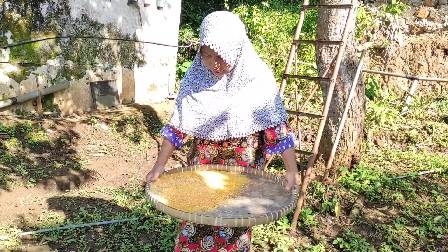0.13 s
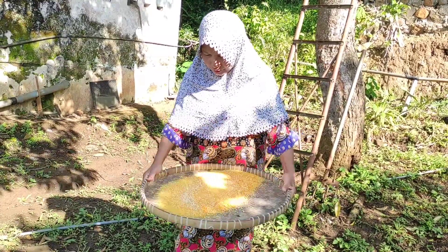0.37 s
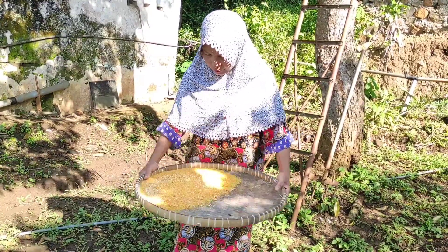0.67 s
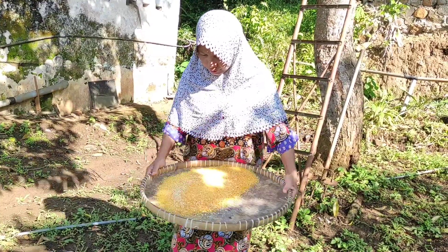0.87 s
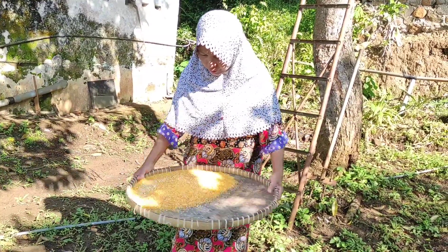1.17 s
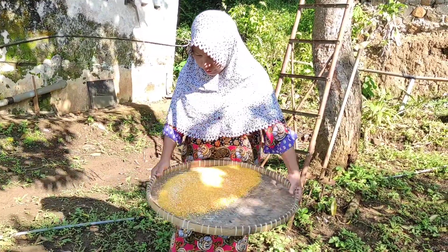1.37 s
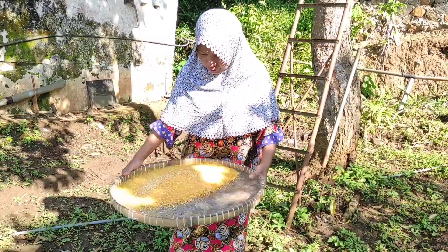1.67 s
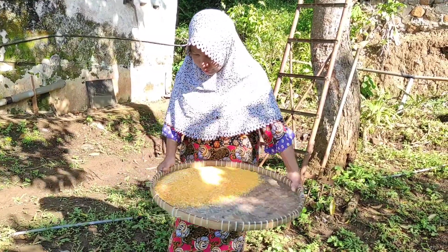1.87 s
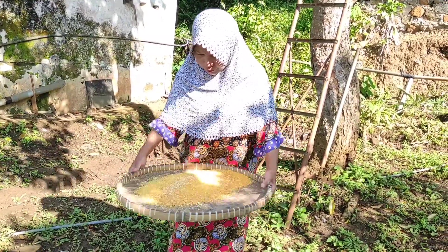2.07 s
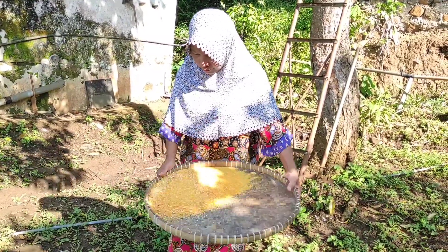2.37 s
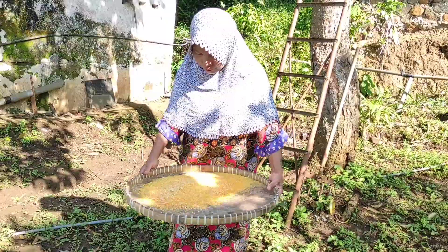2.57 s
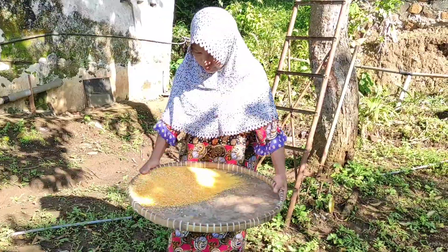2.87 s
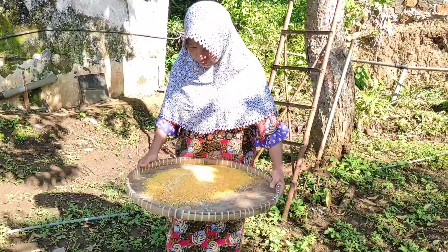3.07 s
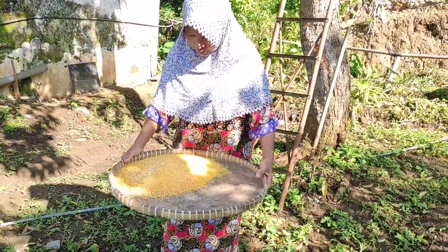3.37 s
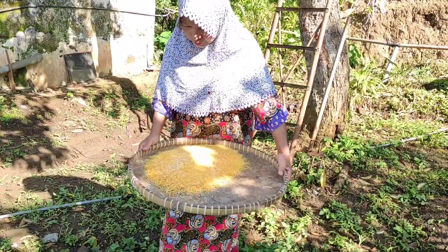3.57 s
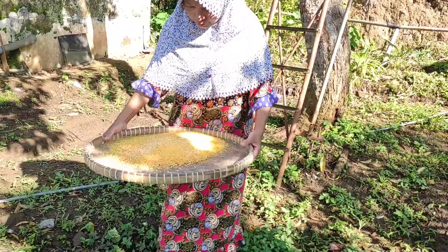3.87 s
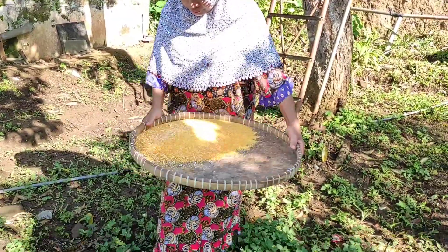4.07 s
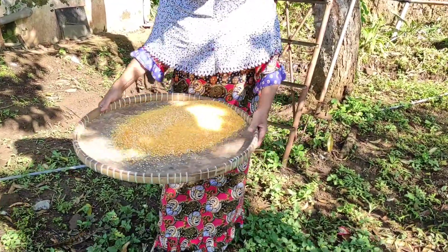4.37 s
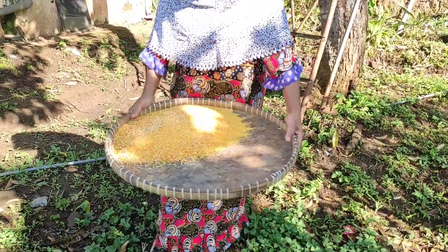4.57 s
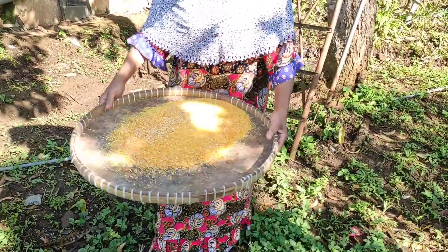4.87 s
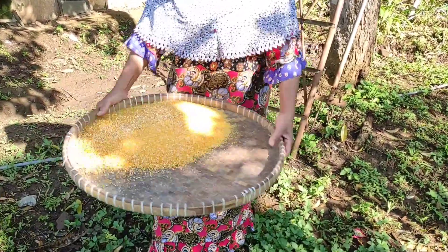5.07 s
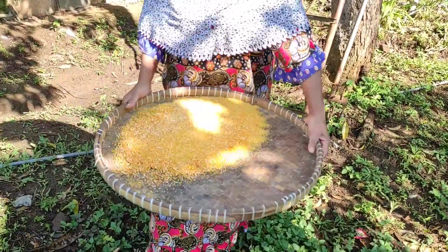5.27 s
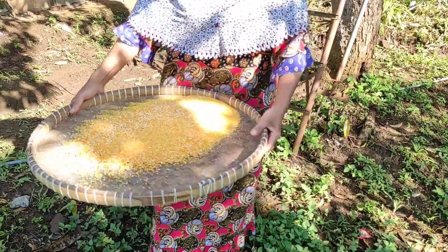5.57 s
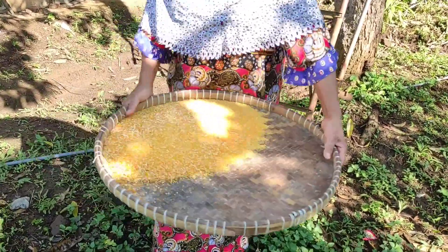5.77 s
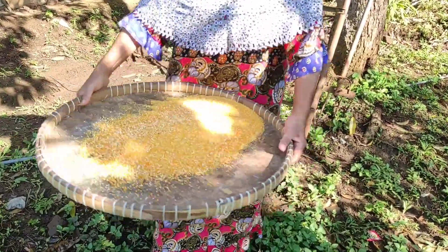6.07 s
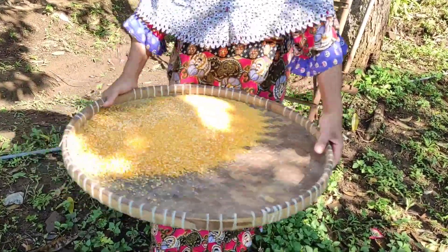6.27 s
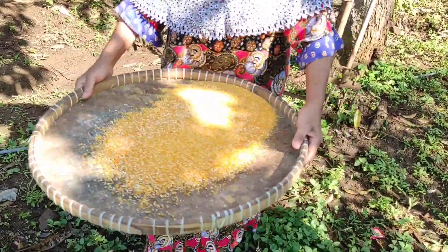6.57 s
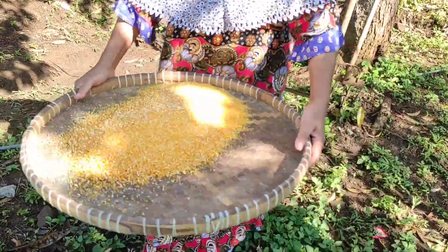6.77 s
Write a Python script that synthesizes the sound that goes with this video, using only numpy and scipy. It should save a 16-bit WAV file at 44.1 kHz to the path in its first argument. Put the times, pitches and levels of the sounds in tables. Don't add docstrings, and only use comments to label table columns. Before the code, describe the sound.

From the start, ground grain slides across a woven bamboo tray in regular alternating strokes, away and back, just under four swells a second. Each is a dense bright hiss of countless kernels with a dry rasp of weave and a muffled hollow drumming, fading to a thin trickle between strokes. The open yard adds a faint murmur of air and leaves. Light wind rumbles unevenly on either side, with brief low thumps near 0.9, 1.6, 3.1, 3.4 and 3.8 seconds. Light rim clicks appear around 2.3, 2.9 and 3.4. After 4 seconds the microphone is nearer: strokes become louder and raspier, with hard dry clicks at 4.6 and 5.1 and a clear one at 6.3. Short spills of hiss sharpen several later strokes. Wind is calmer, with a soft gust near 6.5. Shaking continues strongly to the end at 6.9, cut mid-stroke.

```python
import sys
import numpy as np
from scipy import signal
from scipy.fft import rfft, irfft, next_fast_len
from scipy.io import wavfile
from scipy.ndimage import uniform_filter1d, map_coordinates

SR = 44100
rng = np.random.default_rng(int(sys.argv[2]) if len(sys.argv) > 2 else 0)


def waveform_to_disk(signal):
    frames = np.transpose(np.atleast_2d(signal))
    scaled = np.clip(frames, -1, 1) * 32767
    samples = np.round(scaled).astype(np.int16)
    wavfile.write(sys.argv[1], SR, samples)


def field_ratio(decibels):
    return 10 ** (np.asarray(decibels, dtype=float) / 20)


N = 305172

# time in seconds, mean delay of the left port in samples,
# soil echo delay in ms.
GEOMETRY = [(0, 1.5, 2.5), (2, 3, 2.55), (3.5, 3, 2.7), (4.7, 4.5, 2.93), (5.5, 6, 3.1), (6.92, 6, 3.35)]


def unit(x):
    return x / np.sqrt(np.mean(x ** 2) + 1e-20)


def curves(rows, smooth_s=0.023):
    s, *cols = np.transpose(rows)
    t = np.arange(N) / SR
    return [uniform_filter1d(np.interp(t, s, c), int(smooth_s * SR) + 1) for c in cols]


def wobble(rate_hz):
    knots = rng.standard_normal(int(N * rate_hz / SR) + 4)
    return map_coordinates(knots, [np.arange(N) * rate_hz / SR])


def filtered(x, response):
    m = next_fast_len(N + 8192)
    return irfft(rfft(x, m) * response(np.fft.rfftfreq(m, 1 / SR)), m)[..., :N]


def coloured(x, points):
    f, db = np.transpose(points)
    return unit(filtered(x, lambda hz: field_ratio(np.interp(np.log(hz + 1), np.log(f), db, left=-120))))


def bumps(rows):
    t = np.arange(N) / SR
    return sum(field_ratio(2 * db) * np.exp(-((t - s) / half_s) ** 2) for s, db, half_s in rows)


def yard():
    # frequency in Hz, level in dB.
    yard_tone = [(60, -3), (150, -2.5), (400, -0.5), (1500, -19), (5000, -16), (12500, -35), (14000, -20),
                 (15500, -46)]
    a, b = rng.standard_normal((2, N))
    return field_ratio(-57.0) * coloured(np.array([a + 1.56 * b, a - 0.2 * b]), yard_tone)


def wind():
    calm_db = [-56, -63]
    # centre in seconds, level in dB, port (0 left, 1 right), half length in s.
    gust_events = [(.15, -55, 1, .05), (.55, -55, 1, .05), (.94, -46, 1, .05), (1.05, -54, 0, .12),
                   (1.3, -52, 1, .05), (1.45, -53, 0, .12), (1.58, -46, 1, .07), (1.7, -48, 0, .06),
                   (1.9, -46, 0, 0.062), (2.13, -46.5, 0, .12), (2.65, -47, 1, 0.063), (2.85, -47, 1, 0.08),
                   (3.08, -45.5, 0, .06), (3.32, -47, 0, .05), (3.4, -46, 1, .11), (3.802, -46, 1, .1),
                   (4.08, -49, 1, .04), (4.18, -48, 0, .04), (4.24, -50, 1, .03), (5.25, -51, 0, 0.045),
                   (5.45, -55, 1, .06), (5.92, -52.5, 0, .13), (6.5, -46.5, 1, .06), (6.75, -52, 1, 0.093),
                   (1.1, -55, 1, .8), (3.75, -55, 0, .4)]
    # time in seconds, peak in dB, port (0 left, 1 right), swing in Hz,
    # length in s.
    puff_events = [(.925, -37, 1, 45, .012), (.947, -35, 1, 45, .01), (1.588, -23, 1, 75, .008),
                   (1.88, -38, 0, 50, .015), (2.905, -34, 1, 50, .012), (3.059, -34, 0, 45, .016),
                   (3.082, -27, 0, 35, .008), (3.0805, -31, 0, 220, .006), (3.091, -25, 0, 150, .01),
                   (3.308, -35, 1, 60, .012), (3.315, -38, 0, 50, .02), (3.367, -31, 1, 35, .012),
                   (3.369, -35, 1, 230, .006), (3.379, -26, 1, 100, .008), (3.388, -31, 1, 15, .006),
                   (3.41, -38, 1, 130, .015), (3.762, -35, 1, 60, .01), (3.79, -30, 1, 40, .012),
                   (3.833, -37, 1, 45, .012), (3.868, -35, 1, 50, .01)]
    # frequency in Hz, level in dB.
    gust_tone = [(15, -6), (40, 2), (80, -1.5), (130, -12.5), (250, -20), (600, -53)]

    gusts = [bumps([(s, db, half_s) for s, db, at, half_s in gust_events if round(at) == port])
             for port in range(2)]
    lumps = field_ratio(2.4 * np.array([wobble(14), wobble(14)]))
    rumble = unit(lumps * coloured(rng.standard_normal((2, N)), gust_tone))
    out = np.sqrt([field_ratio(2 * db) + g for db, g in zip(calm_db, gusts)]) * rumble
    t = np.arange(N) / SR
    for s, db, port, hz, life_s in puff_events:
        sign = 1 if hz > 20 else -1
        swing = np.cos(2 * np.pi * hz * (t - s))
        out[int(round(port))] += sign * field_ratio(db) * np.exp(-((t - s) / life_s) ** 2) * swing
    return out


def ticks():
    # time in seconds, peak in dB.
    tick_events = [
        (0.171, -42),
        (1.2206, -54),
        (2.3116, -35),
        (2.8727, -32.5),
        (3.4236, -29),
        (4.5785, -17.5),
        (5.1131, -19.5),
        (5.7119, -42),
        (6.278, -29),
    ]
    out, t = np.zeros(N + SR), np.arange(200) / SR
    for s, db in tick_events:
        hz = 2200 * field_ratio(rng.normal(0, 3.3))
        decay = field_ratio(db + 1.0 - 60 * t / 0.0022)
        out[round(s * SR):][:200] += decay * np.sin(2 * np.pi * hz * t)
    return out[:N]


def impacts(count, spread, scatter_db):
    when, spot, size, sign = rng.random((count, 4)).T
    right = (when * (N - 64)).astype(int) + 32
    delay = curves(GEOMETRY)[0][right] + spread * (spot - .5)
    left = right + np.round(delay).astype(int)
    force = field_ratio(-scatter_db * np.log(size + 0.012)) * np.sign(sign - .5)
    return np.array([np.bincount(port, force, N) for port in (left, right)])


def soil(x, gain, dull_hz):
    late = np.arange(N) - curves(GEOMETRY)[1] * SR / 1000
    dull = filtered(x, lambda hz: 1 / (1 + (hz / dull_hz) ** 2))
    return x - gain * np.array([np.interp(late, np.arange(N), c) for c in dull])


def flow(first_db=0, near_db=0, back_db=0, turn_db=0, weave=0):
    # crest in seconds, crest in dB, time to gain 20 dB in s,
    # time to lose 20 dB in s, weight on the weave in dB.
    away_slides = [(0.235, -28.6, 0.105, 0.116, -0.3), (0.783, -29.2, 0.099, 0.098, 0.0),
                   (1.284, -28.9, 0.094, 0.127, -0.1), (1.845, -27.7, 0.098, 0.117, 0.1),
                   (2.395, -28.6, 0.104, 0.136, 0.5), (2.926, -29.6, 0.069, 0.138, -0.3),
                   (3.486, -29.6, 0.088, 0.113, -0.9), (4.045, -29.0, 0.107, 0.124, -1.2),
                   (4.622, -27.3, 0.078, 0.144, 0.4), (5.174, -26.7, 0.073, 0.137, 0.4),
                   (5.762, -25.9, 0.072, 0.138, 0.4), (6.328, -26.2, 0.076, 0.13, 0.8),
                   (6.879, -26.1, 0.081, 0.134, -0.2)]
    back_slides = [(-0.06, -30.1, 0.021, 0.131, 0.5), (0.473, -29.9, 0.128, 0.123, 0.2),
                   (1.011, -30.2, 0.128, 0.123, 0.8), (1.543, -29.6, 0.123, 0.121, 0.3),
                   (2.095, -31.1, 0.152, 0.133, -0.7), (2.643, -33.1, 0.137, 0.136, 0.2),
                   (3.202, -30.0, 0.135, 0.135, 0.0), (3.741, -30.2, 0.132, 0.151, 0.1),
                   (4.312, -27.9, 0.133, 0.108, -0.5), (4.875, -30.0, 0.121, 0.146, 1.1),
                   (5.451, -29.3, 0.144, 0.134, 0.6), (6.042, -27.9, 0.136, 0.135, -0.0),
                   (6.601, -26.8, 0.131, 0.128, 0.1)]
    rise_power_away, rise_power_back = 2.2, 1.8
    fall_power_away, fall_power_back = 1.54, 1.36
    calm_rise_s, jerk = .1, 1.3
    trickle_db, gain_db = -49.5, 1.3

    t = np.arange(0, N + 64, 64) / SR
    s, db, rise_s, fall_s, weight_db = np.transpose(list(away_slides) + list(back_slides))[:, :, None]
    back = np.arange(len(s))[:, None] >= len(away_slides)
    rise_power = np.where(back, rise_power_back, rise_power_away * (calm_rise_s / rise_s) ** jerk)
    fall_power = np.where(back, fall_power_back, fall_power_away)
    rising = (abs(t - s) / rise_s) ** rise_power
    falling = (abs(t - s) / fall_s) ** fall_power
    gone = np.where(t < s, rising, falling)
    slides = field_ratio(2 * (db - 20 * gone + back_db * back + weave * weight_db))
    power = np.sum(slides, axis=0) + field_ratio(2 * (trickle_db - turn_db))
    return np.interp(np.arange(N) / SR, t, power * field_ratio(2 * (gain_db + first_db + near_db * t)))


def grain():
    # frequency in Hz, level in dB.
    hiss_tone = [(1500, 0), (3500, -0.5), (6000, 0), (8000, 0), (9200, -1.5), (10200, -5), (11500, -1.5),
                 (13500, -1), (15000, -0.5)]
    rasp_tone = [(700, -8.5), (1500, -10.5), (2500, -2), (4000, -7.5), (6000, -9), (9000, -36)]
    weave_tone = [(70, -37), (150, -8), (240, 0), (400, -4), (520, 0.5), (700, -2.5), (1000, -1),
                  (1600, -4.5), (3000, -21.5)]
    # centre in seconds, level in dB, half length in s.
    spill_events = [
        (.632, -38, .0012),
        (.62, -50, .015),
        (2.9, -32, .01),
        (4.59, -33, .012),
        (5.132, -30, .012),
        (5.722, -30, .012),
        (6.194, -43, .006),
        (6.285, -29, .01),
    ]

    surge = field_ratio(0.51 * wobble(30) + 0.48 * wobble(90))
    hiss = coloured(impacts(count=300000, spread=16, scatter_db=.9), hiss_tone)
    hiss = np.sqrt(flow() + bumps(spill_events)) * field_ratio(-4.5) * hiss
    rasp_power = flow(first_db=-11.3, near_db=.3, back_db=1, turn_db=6, weave=1.5)
    rasp = np.sqrt(rasp_power) * coloured(impacts(count=150000, spread=15, scatter_db=1.5), rasp_tone)
    drum = soil(impacts(count=60000, spread=13, scatter_db=1.8), gain=0.55, dull_hz=1580)
    drum_power = flow(first_db=-12.3, near_db=.15, back_db=0.73, turn_db=4, weave=1)
    port_gain = field_ratio(np.array([[2.5], [-1]]))
    drum = np.sqrt(drum_power) * port_gain * coloured(drum, weave_tone)
    return surge * (hiss + rasp + drum)


def scene():
    return grain() + ticks() + wind() + yard()


def band_limit(x):
    return signal.sosfilt(signal.butter(12, 15490, fs=SR, output="sos"), x)


def record(dry):
    # resonance in Hz, width in Hz, lift above 10 kHz in dB.
    port_cavities = [(8630, 1230, 1), (7500, 940, 5)]

    def cavity(hz):
        ramp = np.clip((hz - 9000) / 2000, 0, 1)
        return np.array([c * c / (c * c - hz * hz + 1j * hz * width) * field_ratio(db * ramp)
                         for c, width, db in port_cavities])

    return band_limit(filtered(dry, cavity))


dry = scene()
out = record(dry)
waveform_to_disk(out)
```